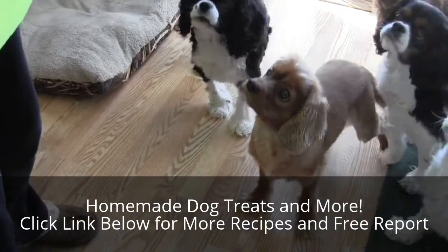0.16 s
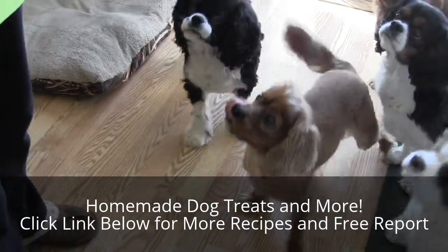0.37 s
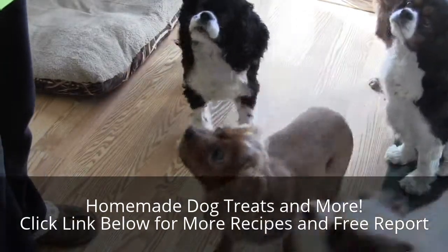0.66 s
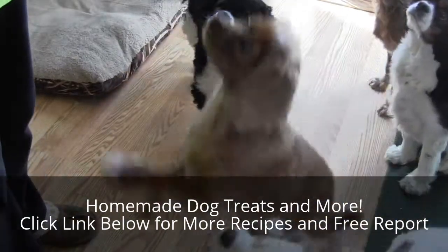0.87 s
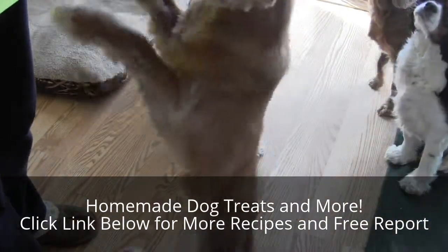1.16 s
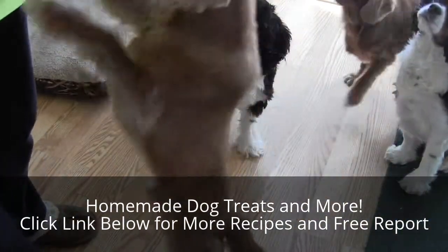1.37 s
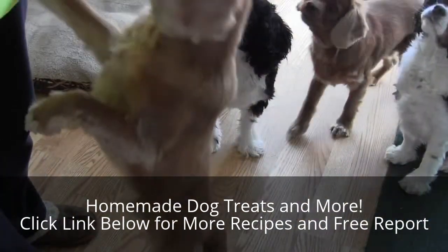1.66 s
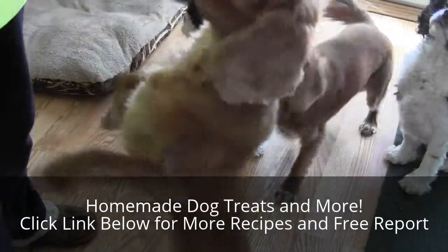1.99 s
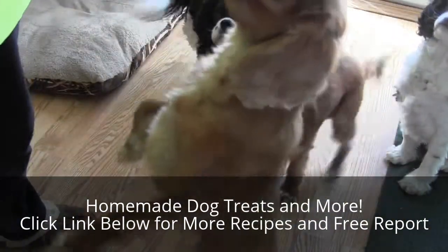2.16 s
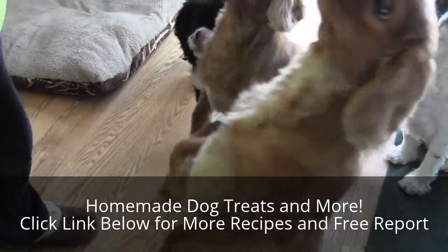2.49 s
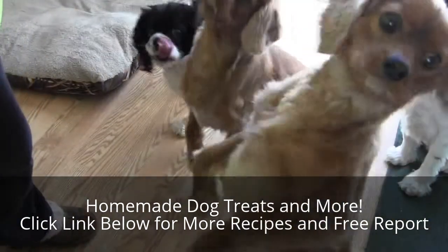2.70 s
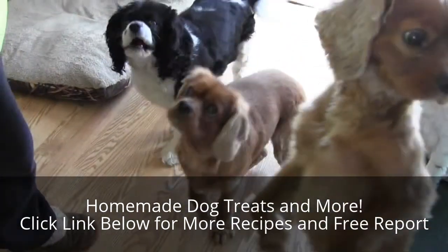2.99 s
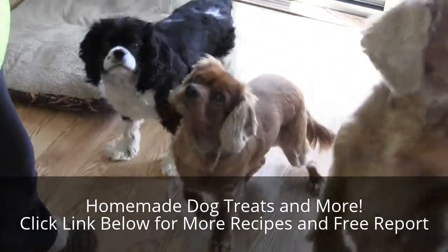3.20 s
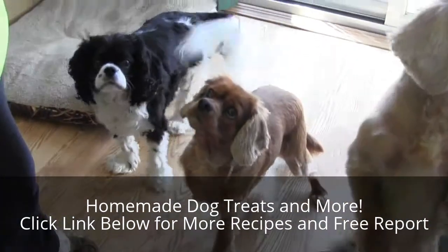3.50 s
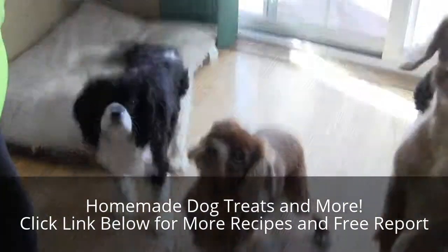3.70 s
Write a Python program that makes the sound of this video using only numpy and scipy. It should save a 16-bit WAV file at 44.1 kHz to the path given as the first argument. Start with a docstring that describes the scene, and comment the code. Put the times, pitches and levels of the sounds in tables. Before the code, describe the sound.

Dog claws click on hardwood from about 0.1 s, sharp, bright and irregular, with a brief skid and fainter taps farther off that die down. Soft paw thuds join from 0.5 s. Tapping thickens from 1.3 to 2.3 s, with short scrapes around 2. Harder steps ring woodily at 2.0 and 3.3, a soft bump falls at 2.7, and two loud close knocks crack at 3.7. Quiet, lively room with faint hum.

```python
"""Several small dogs dance about on a hardwood floor indoors, close to the microphone.
Shaped noise gives quiet air and a low hum throughout; from the first step, minimum-phase claw ticks strike
ringing boards, fainter taps patter farther off, and skids (bursts of band-passed slips) follow.
From half a second on, pads thud as decaying low noise; after two seconds, two hard steps ring at one pitch each.
Something bumps close by, a cracked knock of damped modes: once softly, with a pitched body, then twice hard
near the end."""
import sys
import numpy as np
from scipy import signal
from scipy.fft import rfft, irfft
from scipy.io import wavfile

SR = 44100
rng = np.random.default_rng(int(sys.argv[2]) if len(sys.argv) > 2 else 0)


def dump(signal):
    """Clip the signal to [-1, 1] and save it as 16-bit WAV at the path in sys.argv[1]."""
    limited = np.clip(np.atleast_2d(signal).T, -1, 1)
    pcm = np.round(limited * 32767).astype(np.int16)
    wavfile.write(sys.argv[1], SR, pcm)


N = 169785


def amp(db):
    """Level law: decibels to amplitude gain."""
    return 10 ** (np.asarray(db) / 20)


def unit(x):
    """Energy normalisation: the squares sum to 1."""
    return x / np.sqrt(np.sum(x ** 2) + 1e-20)


def evened(x):
    """Power normalisation: the rms becomes 1."""
    return x / np.sqrt(np.mean(x ** 2) + 1e-20)


def read(points, hz):
    """Linear interpolation of a table on a log-frequency axis."""
    f, value = np.transpose(points)
    return np.interp(np.log(hz + 1), np.log(f), value)


def bins(size):
    """Fourier bin frequencies in Hz."""
    return np.fft.rfftfreq(size, 1 / SR)


def add(mix, s, sound):
    """Superposition: sums a sound into the mix from time s."""
    start = max(round(s * SR), 0)
    part = mix[..., start:][..., :sound.shape[-1]]
    part += sound[..., :part.shape[-1]]


def colour(x, points):
    """Zero-phase filtering by a table of f/Hz, gain/dB."""
    gain = amp(read(points, bins(x.shape[-1])))
    return irfft(rfft(x) * gain, x.shape[-1])


def band(x, hz, octaves):
    """Band-pass filtering: a bell on the octave axis, halved in amplitude at +-octaves."""
    distance = np.log2((bins(len(x)) + 1) / hz) / octaves
    return irfft(rfft(x) / (1 + distance ** 2), len(x))


def dying(t, t60):
    """Exponential decay: the level falls 60 dB in t60 seconds."""
    return np.exp(-np.log(1000) * t / t60)


def causal(gain):
    """Minimum phase: the Hilbert transform of log gain yields the sharpest click of this spectrum."""
    log_gain = np.log(np.r_[gain, gain[-2:0:-1]] + 1e-6)
    return np.fft.ifft(np.exp(np.conj(signal.hilbert(log_gain)))).real


# Side signal of the stereo pair: f/Hz, gain/dB
SIDE_GAIN = [(125, -9.5), (260, -6), (1000, -14.5), (2000, -18), (7000, -8)]


def pair(a, b):
    """Partial coherence: a common signal plus and minus an independent, filtered side signal."""
    side = colour(b, SIDE_GAIN)
    return a + np.array([side, -side])


AIR_RMS_DB = -51.5
HUM_HZ, HUM_WIDTH_OCT, HUM_RMS_DB = 145.5, 0.11, -61
# Relative spectrum of the indoor air: f/Hz, spectral density level/dB
AIR_SPECTRUM = [(25, 14.5), (50, 3.5), (160, 10.5), (420, 9.5), (1000, 8), (4500, 1), (16000, -10)]


def ambience():
    """Stationary noise: broadband air, and a narrow band whose random envelope makes the hum waver."""
    air = evened(colour(pair(*rng.standard_normal((2, N))), AIR_SPECTRUM))
    hum = evened(band(rng.standard_normal(N), HUM_HZ, HUM_WIDTH_OCT))
    return amp(AIR_RMS_DB) * air + amp(HUM_RMS_DB) * hum


ROOM_ONSET_S, ECHO_SHARE, SHIFT_HZ = 0.0014, 0.07, 1.3054  # echo share: fraction of samples
# Reverberation time: f/Hz, t60/s
ROOM_DECAY = [(120, 0.13), (300, 0.69), (700, 0.37), (1700, 0.28), (4500, 0.29), (8000, 0.23),
              (14000, 0.22)]
# Gain of the reflections: f/Hz, gain/dB
ROOM_GAIN = [(100, 12), (400, 1.5), (900, 5.5), (3000, 7), (6500, .5), (10000, -1), (15000, -6)]


def room(x, count=3):
    """Reverberation: dense decaying reflections, their pattern shifting as the dogs move."""
    out, t, clock = np.zeros((2, N)), np.arange(SR // 2) / SR, np.arange(N) / SR
    for k in range(count):
        echoes = rng.standard_normal((2, len(t))) * (rng.random(len(t)) < ECHO_SHARE)
        hz, age, cells = signal.stft(pair(*echoes), SR, nperseg=256)
        decay = dying(age, read(ROOM_DECAY, hz)[:, None])
        tail = signal.istft(cells * decay, SR, nperseg=256)[1][:, :len(t)]
        onset = 1 - np.exp(-(t / ROOM_ONSET_S) ** 2)
        tail = colour(np.sqrt(2) * unit(tail * onset), ROOM_GAIN)
        # staggered cosines weight the tails while keeping their total power constant
        share = np.sqrt(2 / count) * np.cos(2 * np.pi * (SHIFT_HZ * clock + k / count))
        out += signal.fftconvolve((x * share)[None], tail, axes=1)[:, :N]
    return out


PATTER_PER_S, PATTER_START_DB, PATTER_FADE_DB_PER_S = 76, -11, 11  # start level is at t = 0


def patter():
    """Poisson impulses: random claw taps farther off, from the first step on, dying down steadily."""
    t = np.arange(N) / SR
    sizes = amp(PATTER_START_DB - PATTER_FADE_DB_PER_S * t) * (t > CLAW_TAPS[0][0])
    impulses = rng.random(N) < PATTER_PER_S / SR
    return colour(sizes * impulses, CLAW_SPECTRUM)


PAD_DB, PAD_RISE_S, PAD_T60_S = 5, 0.0061, 0.12  # PAD_DB is added to every thud
# Pads landing on the boards: t/s, relative level/dB
PAD_THUDS = [(0.527, -43.5), (0.56, -46), (0.689, -47.5), (1.148, -53), (1.716, -48.5), (2.096, -44),
             (2.51, -54), (2.931, -48.5), (3.014, -38.5), (3.282, -42), (3.556, -42.5)]
# Relative spectrum of a pad on the boards: f/Hz, level/dB
PAD_SPECTRUM = [(60, -29), (115, -2.5), (150, 6), (310, -4), (450, -18), (2500, -53)]


def pads(size=16384):
    """Soft impact: a slow contact excites mainly the low boom of the boards, as decaying noise."""
    out, t = np.zeros(N), np.arange(size) / SR
    shape = np.minimum(t / PAD_RISE_S, 1) * dying(t, PAD_T60_S)
    for s, db in PAD_THUDS:
        boom = unit(shape * colour(rng.standard_normal(size), PAD_SPECTRUM))
        add(out, s, amp(db + PAD_DB) * np.linalg.norm(shape) * boom)
    return out


PITCHED_T60_S, PITCHED_WIDTH_OCT = 0.037, 0.32
# Knocks that ring one pitch: two hard steps, and the body of the soft bump at 2.72 s
# Columns: t/s, level/dB, pitch f/Hz
PITCHED_KNOCKS = [(2.0355, -4, 695), (2.724, -14.5, 370), (3.282, -6.5, 916)]


def pitched_knocks(size=8192):
    """Damped resonance: an impact rings one pitch, a sine within a rough band of noise."""
    out, t = np.zeros(N), np.arange(size) / SR
    for s, db, hz in PITCHED_KNOCKS:
        rough = evened(band(rng.standard_normal(size), hz, PITCHED_WIDTH_OCT))
        ring = .5 * np.sin(2 * np.pi * hz * t) + rough
        envelope = np.minimum(t * hz, 1) * dying(t, PITCHED_T60_S)  # rises over one period
        add(out, s, amp(db) * unit(ring * envelope))
    return out


SKID_GRAIN_DB, SKID_SLIPS_PER_S = 3, 2500  # grain: dB per unit of an exponential draw
# Skidding paws: t/s, length/s, level/dB, centre f/Hz, half-width/octaves
PAW_SKIDS = [(0.091, 0.15, -33, 9900, 0.36), (0.104, .11, -34, 2770, 1.54), (0.124, 0.06, -42, 590, 0.75),
             (1.074, 0.03, -44, 6750, 0.45), (1.924, 0.028, -20.5, 6500, 0.3),
             (2.115, 0.028, -25.5, 7150, 0.41), (2.396, 0.084, -44, 5400, 1),
             (3.113, 0.065, -35.5, 7600, 0.25), (3.418, 0.017, -37.5, 7260, 0.72)]


def skids():
    """Stick-slip friction: dense tiny slips as a paw slides over the grain, swelling and fading."""
    out = np.zeros(N)
    for s, length, db, hz, octaves in PAW_SKIDS:
        slips = (rng.random(SR) < SKID_SLIPS_PER_S / SR) * rng.choice([-1, 1], SR)
        sizes = amp(SKID_GRAIN_DB * np.minimum(rng.exponential(1, SR), 4))
        swell = np.sin(np.linspace(0, np.pi, int(length * SR)))
        rasp = evened(band(slips * sizes, hz, octaves))[:len(swell)]
        add(out, s, amp(db) * swell * rasp)
    return out


CRACK_T60_S = 0.017
# Modes of the bumped body: f/Hz, level/dB before the treble tilt, t60/s
KNOCK_MODES = [(632, 0.5, 0.038), (740, 4.5, 0.037), (1070, -0.5, 0.031), (1480, -1, 0.027),
               (2447, 10, 0.02), (2650, -1, 0.009), (3750, -10, 0.051), (4780, -1, 0.0098)]


def knock(t, treble_db, crack_db):
    """Modal synthesis: damped sines, tilted in dB per octave about 1500 Hz, under a noisy crack."""
    ring = np.zeros(len(t))
    for hz, mode_db, t60 in KNOCK_MODES:
        level = amp(mode_db + treble_db * np.log2(hz / 1500))
        ring += level * dying(t, t60) * np.sin(2 * np.pi * hz * t) * rng.choice([-1, 1])
    crack = colour(rng.standard_normal(len(t)),
                   [(480, -31), (720, 0), (2800, 2.5), (3700, -5.5), (10000, -6.5), (16000, -24)])
    crack = crack * dying(t, CRACK_T60_S)
    return unit(unit(ring) + amp(crack_db) * unit(crack))


THUMP_HZ, THUMP_T60_S, THUMP_LEAD_RAD = 175, 0.022, 0.7  # the left phase leads
# Bumps beside the microphone: t/s, level/dB, low thump/dB, treble tilt/(dB per octave), rough crack/dB
NEAR_BUMPS = [(2.7212, -9, 8, -9, -5), (3.7037, 6.5, -17, -9, -1.5), (3.7092, 10.5, -24, -1.5, 10),
              (3.7102, 11.5, 1.5, -1.5, -6), (3.7133, 7, -1, -8, 4), (3.7636, 14.5, -51, 5.5, -9.5),
              (3.7941, -5.5, -15, -6, 2)]


def bumps(size=4096):
    """Near-field impact: a hollow modal knock over a low damped thump, the deep bass below 120 Hz removed."""
    out, t = np.zeros((2, N)), np.arange(size) / SR
    low_cut = signal.butter(3, 120, "high", fs=SR, output="sos")
    envelope = dying(t, THUMP_T60_S) * np.minimum(t * THUMP_HZ, 1)
    thump = []
    for lead in (THUMP_LEAD_RAD, 0):
        wave = np.sin(2 * np.pi * THUMP_HZ * t + lead) * envelope
        thump.append(unit(signal.sosfilt(low_cut, wave)))
    thump = np.array(thump)
    for s, db, thump_db, treble_db, crack_db in NEAR_BUMPS:
        knocks = pair(knock(t, treble_db, crack_db), knock(t, treble_db, crack_db))
        knocks = knocks * (t < t[-1] / 2)
        sound = signal.sosfilt(low_cut, knocks) + amp(thump_db) * thump
        add(out, s, amp(db) * np.sqrt(2) * unit(sound))
    return out


SPOT_COLOUR_DB = 3  # standard deviation
GRIT_DB, GRIT_T60_S = -10, 0.0033  # each claw scratches as it bites
# One claw on wood: f/Hz, relative level/dB
CLAW_SPECTRUM = [(150, -26), (470, -17), (680, -9), (1600, -6.5), (2500, -3.5), (5000, 1), (6400, 5),
                 (8000, 2.5), (12000, -0.6), (16000, -15)]
# Share of a tap's woody body level that applies: f/Hz, weight
BODY_WEIGHT = [(300, .6), (900, 1), (2000, 1), (5000, 0)]
# Share of a tap's top sizzle level that applies: f/Hz, weight
TOP_WEIGHT = [(6500, 0), (12000, 1)]


def claw(body_db, top_db, size=2048):
    """Hard impact: a minimum-phase tick coloured by its spot, and the same tick with a brief scratch."""
    hz, t = bins(size), np.arange(size) / SR
    spot = np.interp(hz, np.geomspace(500, 16000, 36), SPOT_COLOUR_DB * rng.standard_normal(36))
    bright = evened(amp(read(CLAW_SPECTRUM, hz) + spot + top_db * read(TOP_WEIGHT, hz)))
    tick = causal(bright * amp(body_db * read(BODY_WEIGHT, hz)))
    scratch = unit(np.diff(rng.standard_normal(size + 1)) * dying(t, GRIT_T60_S))
    grit = (t == 0) + amp(GRIT_DB) * scratch
    return tick, np.linalg.norm(tick) * unit(signal.fftconvolve(tick, grit)[:size])


BOARD_DB, BOARD_T60_S = -6, 0.023  # short ring of the board under the claw
CLAW_FALL_DB, CLAW_SCATTER_DB = -6, 3  # last claw against first; standard deviation


def tap(body_db, top_db, spread_s, size=2048, count=4):
    """Excitation and resonator: claws in quick succession, convolved with a brief board ring."""
    t, order = np.arange(size) / SR, np.linspace(0, 1, count)
    delays = abs(spread_s) * (order + (order > 0) * rng.uniform(-.15, .3, count))
    levels = CLAW_FALL_DB * order + CLAW_SCATTER_DB * rng.standard_normal(count)
    strike, ticks = np.zeros(size), []
    for delay, db in zip(delays, levels):
        tick, scratched = claw(body_db, top_db)
        add(strike, delay, amp(db) * scratched)
        ticks.append(tick)
    tick = np.mean(ticks, 0)
    board = np.array([unit(z * dying(t, BOARD_T60_S)) for z in rng.standard_normal((2, size))])
    ring = (t == 0) + amp(BOARD_DB) * pair(*board)
    sound = signal.fftconvolve(unit(strike)[None], ring, axes=1)
    return np.linalg.norm(tick) * sound / np.linalg.norm(ring[0]), tick


PAN_SCATTER_DB = 1.34  # standard deviation, opposite in the two channels
SCRABBLE_DB, SCRABBLE_S = -20.5, 0.034  # level of a small tick at this delay; earlier ones are louder
# Claw taps: t/s, level/dB, woody body/dB, top sizzle/dB, nominal claw spread/s, room send/dB
CLAW_TAPS = [(0.0725, -10.5, 3.5, -3, 0.0013, 0), (0.2171, 6, -4.5, 5, 0.00018, -3.5),
             (0.2692, -7.5, -1, 2, 0.0036, 0.5), (0.383, -5.5, 5, 3.5, 0.00087, -6),
             (0.4247, 0, 5.5, 6, 0.0032, -2), (0.5434, 1.5, -3.5, -3, 0.0019, -5.5),
             (0.6113, -20, 16.5, -10, 0.0018, -6.5), (0.6494, 2, 0, 6, 0.0031, -4),
             (0.6627, -5, 3, 9, 0.0039, -19), (0.6874, 4, 2.5, 6.5, 0.0008, 3),
             (0.8882, -1.5, -5.5, -2, 0.0069, -1), (0.938, -15, 5, -0.5, 0.0018, 7),
             (1.0918, 1, -3, 0, 0.0025, 4), (1.215, -4, 4, 5.5, 0.0045, -1),
             (1.2941, 9.5, -4.5, -1, 0.0019, -5.5), (1.3776, 1.5, 0, 2.5, 0.0049, -2),
             (1.4537, -20.5, 17, 4, 0.0037, 3), (1.4919, 11, -7, 2.5, 0.0029, -13.5),
             (1.503, -1.5, -1.5, -4, 0.00042, 0.5), (1.609, 4.5, -13, -8, 0.0015, -7),
             (1.6222, 0.5, 7.5, 2, 0.0046, -1), (1.6444, 0, -6, 3, 0.0068, 3),
             (1.6924, 0, -1, 4.5, 0.0024, 4), (1.7064, 6.5, -35, 4, 0.0005, -15),
             (1.7814, -6.5, -0.5, -2, 0.0019, 6.5), (1.7877, -11, 11, 11, 0.0033, 2),
             (1.9498, 3.5, -4.5, 7, 0.00066, -1), (1.9565, -2, -5.5, 9, 0.00091, 4.5),
             (1.9679, 1, 6, 0.5, 0.0017, -4), (2.0352, 0, 10.5, 0.5, 0.0055, 0.5),
             (2.058, 1.5, 9, -6, 0.0028, -7.5), (2.0641, -1.5, -2.5, -10, 0.0017, 5.5),
             (2.152, 7, 1.5, 2, 0.0016, 3), (2.1614, 7.5, -3, 11, 0.00097, -7),
             (2.2074, 4.5, 0.5, 0.5, 0.0015, -3.5), (2.2834, -9.5, 3.5, 6.5, 0.002, 6.5),
             (2.4867, 1, 0, 4, 0.00093, -0.5), (2.6466, -0.5, 2, 1, 0.0019, -1.5),
             (2.6675, -0.5, 4, 4.5, 0.0023, 3), (2.6943, -3.5, 11, -9, 0.004, -20),
             (2.7618, -16.5, 16.5, -10, 0.00069, -7.5), (2.9113, 6.5, 3, 3.5, 0.0038, -5.5),
             (2.9246, 0.5, -11, 8, 0.00043, -39), (3.0146, 11, -3, 1.5, 0.0035, -5.5),
             (3.048, -2, 8, -1.5, 0.0022, -9), (3.1072, 4.5, -2, 5.5, 0.0035, -3),
             (3.192, -4.5, 1.5, -2.5, 0.0032, -5), (3.2818, 8, 0, 4, 0.0023, -2.5),
             (3.5258, -1.5, 2, 5.5, 0.00087, -9.5), (3.5508, 7, -0.5, 2.5, 0.0039, -5.5),
             (3.6344, 1, -3.5, 2, 0.00098, -6), (3.7555, -14, 9.5, -9, 0.0028, 10.5),
             (3.8272, -8, 15, 5, 0.0025, -18)]


def claws(count=5):
    """Direct and reverberant paths: near taps with small ticks as each paw settles, and the room send."""
    direct, send = np.zeros((2, N)), np.zeros(N)
    for s, db, body_db, top_db, spread_s, room_db in CLAW_TAPS:
        sound, tick = tap(body_db, top_db, spread_s)
        pan = PAN_SCATTER_DB * rng.standard_normal() * np.array([[1], [-1]])
        add(direct, s, amp(db + pan) * sound)
        add(send, s, amp(db + room_db) * tick)
        for lag in rng.uniform(0, 1.8, count):
            scratched = claw(body_db, top_db)[1]
            gain = amp(db + pan + SCRABBLE_DB) * np.exp(1 - lag)
            add(direct, s + lag * SCRABBLE_S, gain * scratched)
    return direct, send


PITCHED_ROOM_DB, SKID_ROOM_DB, PAD_ROOM_DB, BUMP_ROOM_DB = -10, -8, -10.5, -20


def scene():
    """Superposition of direct and reflected sound; the far taps arrive only by reflection."""
    taps, send = claws()
    skid, thud, pitched, bump = skids(), pads(), pitched_knocks(), bumps()
    send = send + patter()
    send = send + amp(PITCHED_ROOM_DB) * pitched + amp(SKID_ROOM_DB) * skid
    send = send + amp(PAD_ROOM_DB) * thud + amp(BUMP_ROOM_DB) * bump.mean(0)
    return taps + skid + thud + pitched + bump + room(send) + ambience()


EDGE_HZ = 16000
# Channel balance: f/Hz, left minus right level/dB
BALANCE = [(40, 2), (160, -2.5), (1000, 0), (12000, -0.5)]


def record(dry):
    """Transduction: slightly unequal microphones, clipping at full scale, then a band limit."""
    tilt = amp(read(BALANCE, bins(N)) * np.array([[.5], [-.5]]))
    heard = np.clip(irfft(rfft(dry) * tilt, N), -1, 1)
    low_pass = signal.firwin(255, EDGE_HZ, window=("kaiser", 9), fs=SR)
    return signal.oaconvolve(heard, low_pass[None], "same")


dry = scene()
out = record(dry)
dump(out)
```